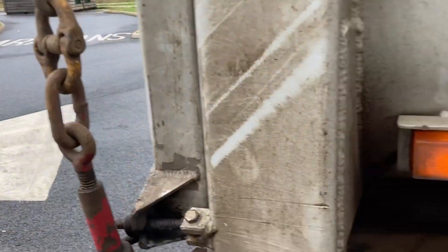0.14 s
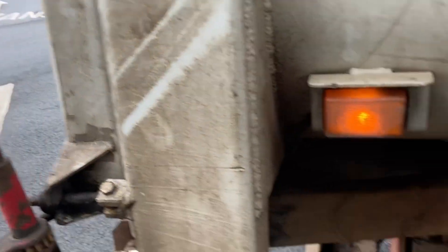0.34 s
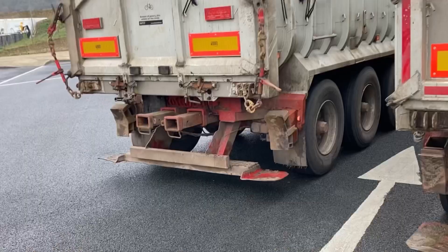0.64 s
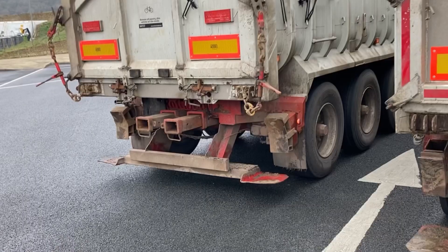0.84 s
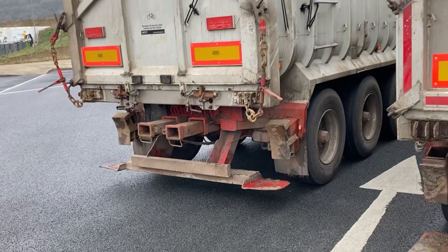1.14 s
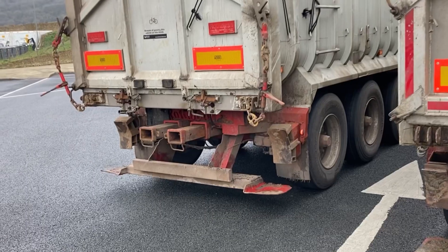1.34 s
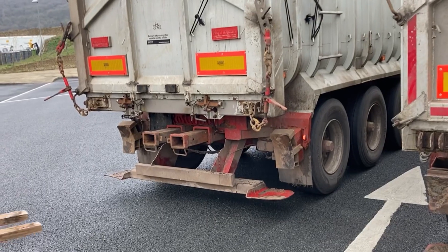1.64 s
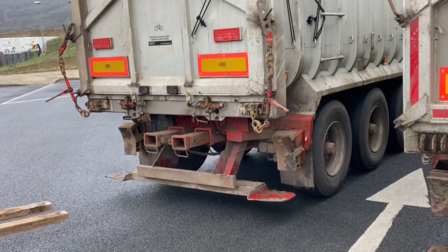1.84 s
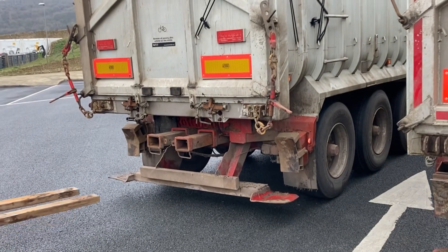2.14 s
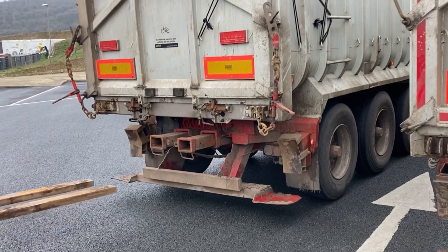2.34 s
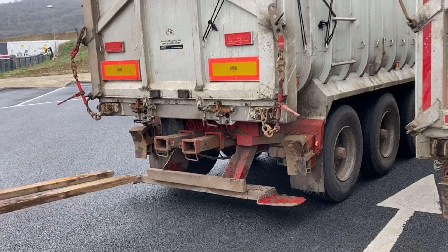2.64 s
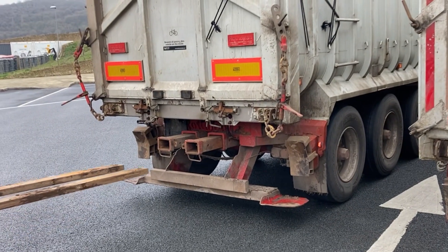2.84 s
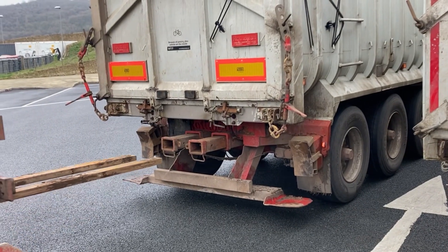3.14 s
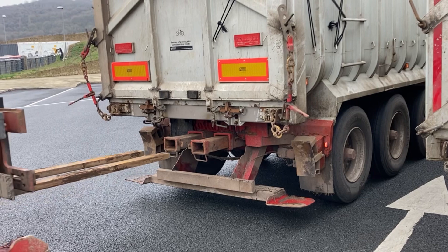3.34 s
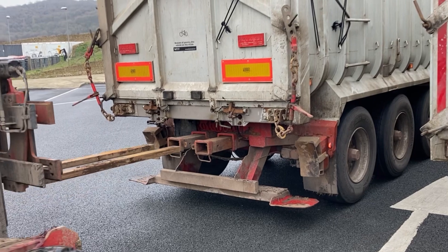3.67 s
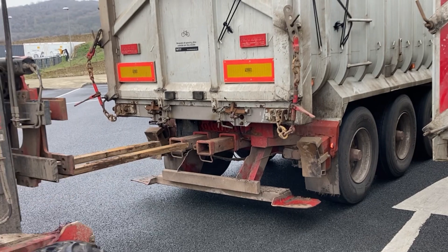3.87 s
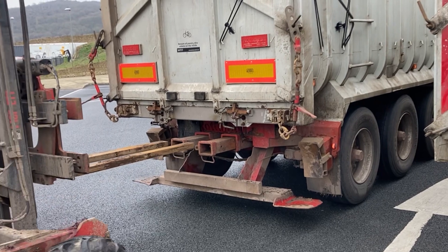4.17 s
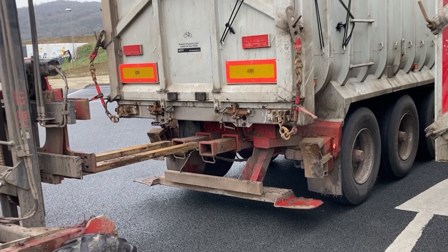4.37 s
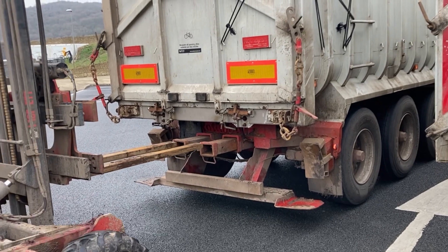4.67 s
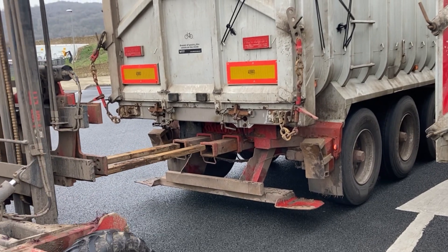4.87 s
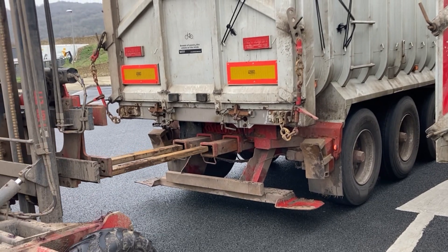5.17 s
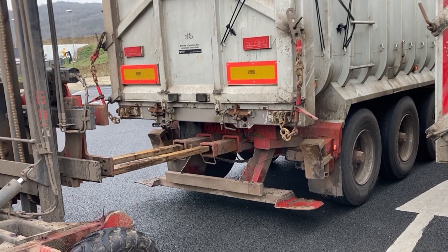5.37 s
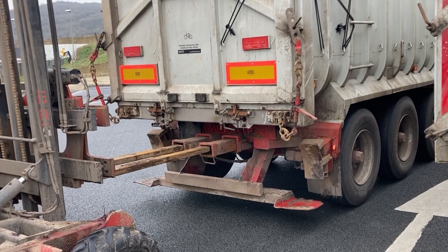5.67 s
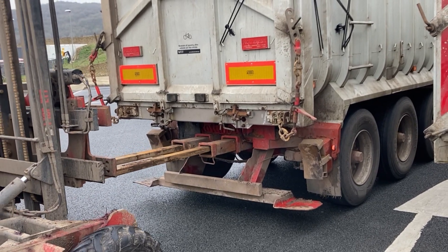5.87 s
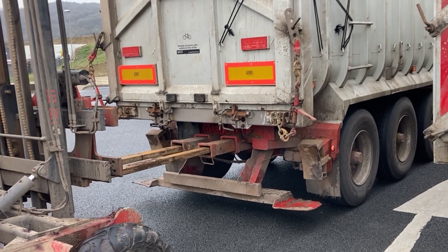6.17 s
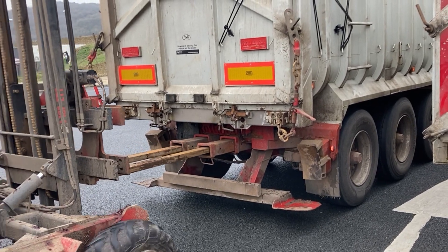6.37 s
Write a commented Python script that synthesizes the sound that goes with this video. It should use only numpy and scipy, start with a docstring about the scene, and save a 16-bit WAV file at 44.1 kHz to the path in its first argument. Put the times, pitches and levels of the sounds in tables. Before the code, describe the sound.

A diesel engine throbs at a distance, then a forklift is suddenly close, clattering as it slows, and revs up at the end.

```python
"""A four-cylinder diesel forklift idles behind a trailer, then is abruptly close, driving in from the left.
Its engine, nine-piston pump and fan radiate tones locked to the firing rate. Each firing excites the
block, which roars, knocks and clatters; the bodywork growls, loose metal rattles, and valve gear and
injectors tick high up. A low hum from the yard beats with the firing tone. The sound reaches two
microphone ports a fraction of a millisecond apart."""
import sys
import numpy as np
from scipy import signal
from scipy.fft import rfft, irfft, next_fast_len
from scipy.io import wavfile
from scipy.ndimage import uniform_filter1d

SR = 44100
rng = np.random.default_rng(int(sys.argv[2]) if len(sys.argv) > 2 else 0)


def inscribe(sig):
    """Save sig as 16-bit PCM at rate SR to the path in sys.argv[1].

    A 1-D sig is mono; a 2-D sig holds one channel per row.
    Samples are clipped to [-1, 1] before scaling.
    """
    pcm = np.round(np.clip(np.atleast_2d(sig).T, -1, 1) * 32767)
    wavfile.write(sys.argv[1], SR, pcm.astype(np.int16))


N = 287091
T = np.arange(N) / SR

# Dull knocks of the distant idle. Each row: start in seconds, level in dB, frequency in Hz.
IDLE_KNOCKS = [(0.062, -12, 204), (0.102, -16, 256), (0.153, -17, 163), (0.175, -13.5, 211),
               (0.225, -17, 264), (0.328, -14, 158), (0.46, -18, 258), (0.494, -12.5, 192)]
# The idle behind the trailer. Each row: time in seconds, bass, body and treble levels in dB.
IDLE_BANDS = [(0., -19, -34, -39), (.075, -22.5, -33.5, -38.5), (.2, -29, -34, -38),
              (.49, -23.5, -33, -38.5), (.615, -26, -35, -38)]
# Faint tones of the idle. Each row: frequency in Hz, level in dB.
IDLE_TONES = [(62, -32), (86, -48), (355, -41), (608, -48.5), (790, -49)]
# Combustion strength. Each entry: relative level of one cylinder in dB.
CYLINDER_LEVELS = [-1, 6.5, -2.5, -28]
# The two ports. Each row: frequency in Hz, then coherence from 0 to 1 and lead of the left port
# in half turns, for each of three positions: far left, beside, behind the trailer.
PORT_COHERENCE = [(60, .985, .03, .985, .03, .7, 0.), (100, .985, .045, .985, .04, .65, 0.),
                  (300, .98, .13, .97, .13, .55, -.1), (550, .92, .3, .9, .37, .4, -.3),
                  (700, .88, .42, .8, .24, .35, -.4), (860, .84, .55, .78, .3, .3, -.5),
                  (1000, .8, .7, .75, .5, .3, -.6), (1550, .8, 1., .75, 1., .4, -1.),
                  (2100, .75, 1.5, .3, 1.6, .35, -1.4), (2500, .7, 1.9, .7, 2.2, .3, -1.8),
                  (3000, .5, 2.4, .8, 3., .3, -2.3), (3700, .55, 3., .65, 3.8, .25, -3.),
                  (4500, .45, 4., .7, 4.3, .25, -4.), (5400, .35, 4.7, .92, 5., .25, -4.7),
                  (6800, .5, 5.9, .85, 6., .5, -5.9), (8300, .8, 6.5, .85, 6.5, .8, -6.5),
                  (8700, .99, 6.97, .99, 6.97, .99, -6.97), (9400, .99, 7.03, .99, 7.03, .99, -7.03),
                  (11200, .8, 8., .9, 8., .8, -8.), (13200, .99, 8.97, .99, 8.95, .99, -8.97),
                  (14400, .99, 9.03, .99, 9.05, .99, -9.03), (15300, .99, 10., .99, 10., .99, -10.)]
# Port balance. Each row: frequency in Hz, left minus right in dB from far left, the same from beside.
PORT_BALANCE = [(60, .4, -.1), (110, .5, -.1), (200, .5, .3), (380, .8, -.4), (700, 2, 3.5), (1290, 1.5, 3),
                (2380, -.5, 1), (4400, 0, 0), (8120, -.5, 0), (15000, 0, 0)]
# The truck's path. Each row: time in seconds, bearing from 0 (far left) to 1 (beside the microphone).
TRUCK_BEARING = [(.62, 0.059), (1.5, 0.16), (2, 0.19), (2.5, 0.51), (3, 0.55), (3.5, 0.92), (4, 1.),
                 (6.51, 1)]
# The close engine. Each row: time in seconds, firing rate in Hz, then relative levels in dB
# of load and nearness, of the block's roar and of the hiss.
ENGINE_RUN = [(.62, 56.76, -3, -23, -52), (.82, 56.94, -2, -21, -51), (1.18, 54.11, -2, -20, -51),
              (1.7, 53.4, 0, -24, -48.5), (2.05, 51.67, 0, -16, -47.5), (2.6, 50.83, 1, -14, -46),
              (3.05, 49.96, 1, -12.5, -45), (3.3, 48.81, 0, -20.5, -45), (3.7, 45.27, -1.5, -13, -46),
              (3.95, 45.16, -1.5, -14.5, -43), (4.2, 43.61, -2.5, -11, -44.5),
              (4.55, 44.77, -1.5, -17.5, -45), (4.8, 43.21, -1.5, -18, -44.5),
              (5.04, 45.18, -2, -11.5, -44.5), (5.16, 43.88, -2, -13, -44.5), (5.27, 41.35, -4, -18, -45),
              (5.39, 40.05, -3.5, -20, -46), (5.7, 42.43, -2, -15, -44.5), (5.94, 45.5, -1.5, -16, -44),
              (6.1, 50.44, 3, -10, -41), (6.24, 54.87, 4.5, -15, -40), (6.35, 56.14, 5, -14, -40.5),
              (6.51, 56.74, 5.5, -23, -40)]
# Engine tones locked to the firing rate, with pump and fan overtones. Each row: multiple of the firing
# rate (sounded at the nearest quarter), share of the load it follows, waver in dB, response of pipe,
# bodywork and yard as pairs of Hz and dB.
ENGINE_ORDERS = [(1, 0.76, 0.8, [(40, -33), (44, -27), (47, -27), (49, -21), (51, -21), (54, -19),
                 (57, -18)]), (2.003, 0.7, 0.23, [(80, -11), (90, -14), (101, -15.5), (104, -18),
                 (114, -17)]), (3, 0.21, 1, [(120, -24.5), (132, -25.5), (138, -29.5), (144, -28),
                 (152, -38), (157, -40), (160, -28), (170, -31)]), (7 / 4, 0.46, 0.93, [(70, -39),
                 (85, -42), (100, -35)]), (9 / 4, 0.5, 1.2, [(90, -35), (104, -30), (115, -44),
                 (128, -48)]), (13 / 4, 0.5, 1.6, [(150, -54), (166, -40), (184, -36)]),
                 (37 / 4, 0.38, 1.7, [(450, -63), (490, -40.5), (525, -42)]),
                 (27 / 2, 0.5, 2.5, [(540, -59), (610, -43), (690, -46), (770, -45)]),
                 (4.12, 0., 1.5, [(160, -26), (168, -30), (178, -44), (230, -53)]),
                 (18, 0.3, 1.5, [(800, -54), (840, -41), (855, -41), (875, -62)]),
                 (18, 0.3, 0.96, [(780, -57), (840, -44), (862, -38), (880, -42), (905, -48), (930, -43),
                 (985, -59), (1015, -43.5)]), (20, 0.3, 0.99, [(840, -50), (870, -37.5), (885, -39.5),
                 (905, -48), (950, -58)])]
# The pump's tone. Each row: time in seconds, level in dB.
PUMP_LEVELS = [(.62, -40), (1.3, -33), (1.8, -49), (2.3, -34), (2.8, -26.5), (3.05, -22), (3.5, -24.5),
               (3.8, -28), (4.3, -29.5), (5.05, -29), (5.3, -29), (5.8, -34.5), (5.95, -26.5), (6.12, -28),
               (6.18, -23), (6.23, -17), (6.29, -24.5), (6.42, -24.5), (6.48, -14.5)]
# The fan. Each row: time in seconds, level of the blade tone in dB, level of its octave in dB.
FAN_LEVELS = [(.62, -22.5, -42), (.95, -27.5, -50), (1.1, -28, -52), (1.35, -33, -45), (1.7, -27, -39),
              (1.92, -24.5, -39), (2.05, -20.5, -30), (2.35, -25, -32), (2.55, -18.5, -37), (2.7, -20, -50),
              (2.95, -16.5, -34), (3.17, -18, -37), (3.27, -27, -46), (3.5, -41, -52), (3.75, -35, -52),
              (5.1, -31.5, -50), (5.4, -42, -46), (5.9, -35, -46), (6.09, -30, -44), (6.13, -19, -36),
              (6.19, -16.5, -34), (6.24, -28, -40), (6.34, -21, -40), (6.43, -26.5, -31), (6.51, -28, -38)]
# The bodywork's growl. Each row: time in seconds, frequency in Hz, relative level in dB.
BODY_RESONANCE = [(.62, 455, -24), (1, 446, -26.5), (1.4, 435, -22.5), (1.8, 406, -23.5), (2.1, 387, -25.5),
                  (2.5, 363, -26.5), (3.2, 334.5, -24), (4, 328, -23), (5.2, 327.4, -27.5), (5.6, 323, -24),
                  (6.1, 331, -21.5), (6.51, 332, -19.5)]
# A thin whine. Each row: time in seconds, level in dB.
WHINE_LEVELS = [(.62, -48), (2.8, -42), (3.3, -32), (3.8, -45), (4.3, -31), (4.8, -50), (5.1, -42),
                (5.6, -55), (6, -40), (6.51, -43)]
# Loose metal on the mast. Each row: mode frequency in Hz, relative level in dB.
MAST_MODES = [(1950, -1.5), (2250, -3.5), (2450, 5), (2750, 1), (3300, 5), (3850, -3.5), (4300, -7)]
# Hard combustion raps. Each row: start in seconds, relative level in dB.
HARD_RAPS = [(1.2112, -30), (1.961, -18), (2.1146, -27), (2.157, -29), (2.1919, -25), (2.2518, -26),
             (3.042, -29), (3.1378, -27), (3.3015, -20), (3.4715, -23), (3.5364, -25), (3.7973, -24),
             (4.2702, -25), (4.4483, -25), (5.3707, -22), (5.468, -26), (5.912, -23), (6.0197, -23)]
# The loudest injector ticks. Each row: start in seconds, relative level in dB, frequency in Hz.
LOUD_TICKS = [(2.9478, -35, 11700), (3.1888, -28, 12000), (3.2701, -34, 12200), (3.3968, -33, 12100),
              (3.4357, -33, 12400), (3.6073, -32, 12300), (3.6532, -31, 12300), (4.0693, -32, 12200),
              (4.4574, -30, 12400), (4.5946, -28, 12100), (4.843, -31, 12100), (4.866, -34, 12200),
              (4.9118, -32, 12300), (4.9567, -29, 12300), (5.2042, -29, 12300), (5.2755, -30, 12400),
              (5.301, -29, 12300), (5.3274, -34, 12400), (5.3509, -27, 11800), (5.3758, -27, 12300),
              (5.4531, -28, 12400), (5.4751, -29, 12100), (5.499, -31, 11900), (5.6966, -32, 12300),
              (5.7634, -24, 12400), (5.9864, -31, 11900)]
# Spectra of the engine's broadband sounds. Each row: frequency in Hz, relative spectral density in dB.
IDLE_SPECTRUM = [(30, -16), (45, -3), (85, -4), (125, -10), (350, -9), (700, -18.5), (1500, -25),
                 (3000, -33), (5500, -45.5), (9000, -49), (12500, -56.5), (16000, -75)]
ROAR_SPECTRUM = [(27, -38), (46, -13), (75, -6), (102, -19.5), (118, -14.5), (152, -15), (269, -7.5),
                 (323, -5), (415, -25), (470, -14.5), (700, -26), (910, -47), (1540, -120)]
KNOCK_SPECTRUM = [(40, -23), (95, -7), (160, -14), (300, -1.5), (430, -9), (520, -8.5), (600, -18),
                  (860, -18), (1100, -22), (1600, -50)]
CLATTER_SPECTRUM = [(350, 0.5), (500, -3.5), (700, 1), (900, -4), (1150, -1.5), (1400, -4), (1700, -10),
                    (2100, -10), (2600, -13), (3100, -15), (3800, -16), (4600, -21.5), (5200, -33),
                    (7000, -41)]
RASP_SPECTRUM = [(1500, -9.5), (1900, 10.5), (2300, 0.5), (2800, 6), (3300, -1.5), (3900, 0), (4600, -2),
                 (5500, -59)]
HISS_SPECTRUM = [(3500, -55), (5000, 1.5), (7000, 0.5), (9000, -5), (11000, 2), (13000, -4.5), (14000, -9),
                 (16000, -6.5)]

IDLE_FIRING_HZ, CLOSE_FROM_S, FIRING_AT_S = 29.34, 0.618, 5.302
TICK_HZ, SOFT_TICKS_FROM_S = 12300, 2.8


def gain_of(db):
    """Decibels express an amplitude ratio on a logarithmic scale."""
    return 10 ** (np.asarray(db) / 20)


def unit_rms(x):
    """Normalisation gives each channel unit mean power."""
    return x / np.sqrt(np.mean(x ** 2, axis=-1, keepdims=True) + 1e-20)


def white_pair():
    """Two incoherent white noises."""
    return rng.standard_normal((2, N))


def at_frequency(table, hz, column=1):
    """Interpolation of one column on a logarithmic frequency axis."""
    columns = np.transpose(table)
    return np.interp(np.log(hz + 1), np.log(columns[0] + 1), columns[column])


def curves(table):
    """Linear interpolation in time of every column after the first."""
    times, *columns = np.transpose(table)
    return [np.interp(T, times, column) for column in columns]


def by_bearing(far_left, beside):
    """Linear interpolation between two values as the truck drives in."""
    return far_left + (beside - far_left) * curves(TRUCK_BEARING)[0]


def coloured(x, spectrum):
    """Linear filtering imposes a spectrum on x; the result has rms 1."""
    size = next_fast_len(N)
    response = gain_of(at_frequency(spectrum, np.fft.rfftfreq(size, 1 / SR)))
    return unit_rms(irfft(rfft(x, size) * response, size)[..., :N])


def wander(hz):
    """Low-pass filtered noise fluctuates slowly, with rms 1."""
    return unit_rms(signal.sosfilt(signal.butter(2, hz, fs=SR, output="sos"), rng.standard_normal(N)))


def resonate(x, hz, width_hz):
    """Heterodyning makes a movable resonance of rms 1: shift hz to zero, low-pass, shift back."""
    carrier = np.exp(2j * np.pi * np.cumsum(hz * np.ones(N)) / SR)
    low_pass = signal.butter(2, width_hz / 2, fs=SR, output="sos")
    return unit_rms((carrier * signal.sosfilt(low_pass, x / carrier)).real)


def combustion_pulses(firings, scatter_db, decay):
    """Impulsive excitation: an envelope jumps at each firing; decay is a share of the interval."""
    count = firings.astype(int)
    chance = np.clip(rng.standard_normal(count[-1] + 1), -1.6, 1.6)
    strength = gain_of(np.asarray(CYLINDER_LEVELS)[count % 4] + scatter_db * chance[count])
    return strength * np.exp(-(firings % 1) / decay)


def distant_idle():
    """Amplitude modulation: behind the trailer, firings pulse the bass and body under faint tones."""
    noise = coloured(white_pair(), IDLE_SPECTRUM)
    bass = signal.sosfiltfilt(signal.butter(2, 125, fs=SR, output="sos"), noise)
    treble = signal.sosfiltfilt(signal.butter(2, 700, "high", fs=SR, output="sos"), noise)
    body = noise - bass - treble
    pulses = combustion_pulses(IDLE_FIRING_HZ * T + 0.047, scatter_db=1.8, decay=0.16)
    throb = uniform_filter1d(pulses, size=130)
    bands = [bass * (1 + 0.93 * throb), body * (1 + 1.6 * throb) * gain_of(4 * wander(12)), treble]
    rumble = sum(unit_rms(band) * gain_of(db) for band, db in zip(bands, curves(IDLE_BANDS)))
    tones = sum(gain_of(db) * np.cos(2 * np.pi * (hz * T + rng.random())) for hz, db in IDLE_TONES)
    return rumble + tones


def dull_knocks(decay_cycles=0.95, rise_cycles=0.24):
    """Heavily damped oscillation: each knock of the idle dies within a few periods."""
    out = np.zeros(N)
    for start, db, hz in IDLE_KNOCKS:
        cycles = np.arange(round(6 * decay_cycles * SR / hz)) * hz / SR
        envelope = np.exp(-cycles / decay_cycles) * (1 - np.exp(-cycles / rise_cycles))
        ring = gain_of(db) * np.sin(2 * np.pi * cycles) * envelope
        span = out[round(start * SR):][:len(ring)]
        span += ring[:len(span)]
    return out


def microphone_ports(pair, bearing, column):
    """Partial coherence: the right port hears the left one's sound late, with unrelated reflections."""
    hz, t, (direct, reflected) = signal.stft(pair, SR, nperseg=512, noverlap=384)
    share = np.interp(t, T, bearing)

    def blend(table, first, second):
        start, end = (at_frequency(table, hz, k)[:, None] for k in (first, second))
        return (1 - share) * start + share * end

    coherence = blend(PORT_COHERENCE, column, column + 2)
    lead = blend(PORT_COHERENCE, column + 1, column + 3)
    right = coherence * direct * np.exp(-1j * np.pi * lead) + np.sqrt(1 - coherence ** 2) * reflected
    lean = gain_of(blend(PORT_BALANCE, 1, 2) / 2)
    return signal.istft(np.array([direct * lean, right / lean]), SR, nperseg=512, noverlap=384)[1][:, :N]


def engine_orders(firing_hz, firings, load_db):
    """Periodicity locks tones to the firing rate; unequal cylinders throb once in four firings."""
    unevenness = 0.017 + 0.19 * np.exp(-((T - 3.5) / 0.16) ** 2)  # grows as the engine briefly stumbles
    throb = 1 + unevenness * np.cos(2 * np.pi * firings / 4 + 1.8)
    lagged_hz = np.interp(T - 0.067, T, firing_hz)  # resonances swept quickly answer late
    out = np.zeros(N)
    for order, load_share, waver_db, response in ENGINE_ORDERS:
        db = at_frequency(response, order * lagged_hz) + load_share * load_db + waver_db * wander(6.5)
        jitter = 0.02 * max(order - 3, 0) * wander(10.6)
        out += np.sqrt(2) * gain_of(db) * np.cos(np.pi / 2 * round(4 * order) * firings + jitter)
    return throb * out


def piston_pump(firings, load_db):
    """Pressure ripple: nine pistons sound a tone at 9/2 of the firing rate, steadier under load."""
    looseness = gain_of(-2 * np.maximum(load_db, 0))
    db = curves(PUMP_LEVELS)[0] + by_bearing(1, 3) * looseness * wander(19)
    jitter = by_bearing(0.2, 0.7) * looseness * wander(10)
    return np.sqrt(2) * gain_of(db) * np.cos(2 * np.pi * 9 / 2 * firings + jitter)


def fan(firings):
    """Blade passage radiates a tone and its octave, at 6 and 12 times the firing rate."""
    out = np.zeros(N)
    for order, db in zip((6, 12), curves(FAN_LEVELS)):
        amplitude = np.sqrt(2) * gain_of(db + 1.1 * wander(10.6))
        out += amplitude * np.cos(order * (2 * np.pi * firings + 0.02 * wander(13)))
    return out


def yard_hum(load_db, hz=50):
    """Beating: a hum from the yard and a narrow drone lie close to the firing tone."""
    drone = resonate(rng.standard_normal(N), 50.2, width_hz=16)
    drone *= gain_of(by_bearing(-33, -32) - 0.5 * load_db)
    amplitude = np.sqrt(2) * gain_of(-32 + 1.4 * wander(3))
    return drone + amplitude * np.cos(2 * np.pi * hz * T + 1.24 * wander(1.3))


def block_roar(firings, roar_db):
    """Forced vibration: the block radiates low noise that swells at each firing."""
    drive = white_pair() * (1 + 0.6 * combustion_pulses(firings, scatter_db=1.5, decay=0.6))
    return coloured(drive, ROAR_SPECTRUM) * gain_of(roar_db - 8 + 0.66 * wander(5.3))


def bodywork_growl():
    """Resonance: noise drives a broad and a narrow peak of the bodywork, which glide together."""
    hz, db = curves(BODY_RESONANCE)
    drive = white_pair()
    growl = resonate(drive, hz, width_hz=82) + 0.5 * resonate(drive, 1.03 * hz, width_hz=19)
    return growl * gain_of(db - 2.5)


def cylinder_knock(firings, load_db, likeness=0.7, points=64):
    """Periodicity: each cylinder repeats its own knock on the block, giving a comb of quarter orders."""
    shared, own = rng.standard_normal(points), rng.standard_normal((4, points))
    decay = np.exp(-np.arange(points) / points / 0.47)
    cycle = ((likeness * shared + (1 - likeness) * own) * decay).ravel()
    knocks = np.interp(firings * points, np.arange(4 * points), cycle, period=4 * points)
    return coloured(knocks, KNOCK_SPECTRUM) * gain_of(-25.5 + 0.89 * load_db + 1.3 * wander(8.9))


def clatter(firings, load_db):
    """Amplitude modulation: each firing throbs in the metal's midrange noise, which grows with load."""
    drive = white_pair() * (1 + 0.15 * combustion_pulses(firings, scatter_db=0.53, decay=1))
    return coloured(drive, CLATTER_SPECTRUM) * gain_of(-24 + load_db + 0.19 * wander(15))


def combustion_rasp(firings, load_db):
    """Repeated impulsive excitation: small raps merge into a rasp, bunching once per engine cycle."""
    bunching = gain_of(0.67 * np.cos(2 * np.pi * firings / 4 + 0.18) + 2 * wander(24))
    pulses = 1 + 0.36 * combustion_pulses(firings, scatter_db=1.6, decay=0.29)
    rasp = coloured(white_pair() * bunching * pulses, RASP_SPECTRUM)
    return rasp * gain_of(by_bearing(-41, -36.5) + 0.23 * load_db)


def engine_hiss(firings, hiss_db):
    """Modulation at two rates: treble noise pulses with each firing and with each engine cycle."""
    drive = white_pair() * (1 + 0.29 * combustion_pulses(firings, scatter_db=3, decay=0.6))
    flicker_db = 0.92 * wander(18) + np.cos(2 * np.pi * firings / 4 + 0.2)
    return coloured(drive, HISS_SPECTRUM) * gain_of(hiss_db + 7.5 + flicker_db)


def shimmer(x, depth_db):
    """Colouration: random, slowly shifting spectral ripples give the clatter a faint ringing colour."""
    _, _, spectra = signal.stft(x, SR, nperseg=1024, noverlap=768)
    ripples = uniform_filter1d(rng.standard_normal(spectra.shape), size=2, axis=0)
    ripples = uniform_filter1d(ripples, size=24, axis=1)
    response = gain_of(depth_db * np.tanh(ripples / ripples.std()))
    return signal.istft(spectra * response, SR, nperseg=1024, noverlap=768)[1][:, :N]


def ground_reflection(x):
    """Interference with a dull echo off the asphalt hollows out a band, lower as the truck nears."""
    delay_s = by_bearing(0.9, 1.22) / 1000
    echo = np.array([np.interp(T - delay_s, T, dull) for dull in uniform_filter1d(x, size=24)])
    return x + by_bearing(0.26, 0.44) * echo


def mast_rattle(load_db, taps_per_s=110, t60_s=0.016):
    """Free vibration: loose parts tap at random, each tap ringing one damped mode."""
    strength = gain_of(3.5 * np.minimum(rng.exponential(1, (2, N)), 3))
    taps = strength * (rng.random((2, N)) < taps_per_s / SR)
    struck_mode = rng.integers(0, len(MAST_MODES), (2, N))
    t, out = T[:2500], np.zeros((2, N))
    for mode, (hz, db) in enumerate(MAST_MODES):
        ring = gain_of(db - 60 * t / t60_s) * (1 - np.exp(-t / 0.001)) * np.sin(2 * np.pi * hz * t)
        out += signal.oaconvolve(taps * (struck_mode == mode), ring[None])[:, :N]
    return unit_rms(out) * gain_of(-45 + 0.5 * load_db)


def radiator_hiss():
    """Directivity: a band of hiss off the radiator side fades as the truck draws alongside."""
    return resonate(white_pair(), 5400, width_hz=1800) * gain_of(by_bearing(-44, -60))


def thin_whine():
    """Narrow-band noise is heard as a wavering pitch."""
    return resonate(white_pair(), 866.6, width_hz=13) * gain_of(curves(WHINE_LEVELS)[0])


def valve_taps(firings, scatter_db, decay):
    """Impact envelope of the valve gear: a tap at each firing, a softer one half way to the next."""
    count = (2 * firings).astype(int)
    chance = np.clip(rng.standard_normal(count[-1] + 1), -1.6, 1.6)
    return gain_of(scatter_db * chance[count] - 6.2 * (count % 2)) * np.exp(-(firings % 0.5) / decay)


def valve_gear(firings, load_db):
    """Impact excitation: the taps drive two high resonances, a ring and a ticking."""
    ring_drive = white_pair() * (0.5 + valve_taps(firings, scatter_db=4, decay=0.33))
    tick_drive = white_pair() * (0.5 + valve_taps(firings, scatter_db=4.5, decay=0.25))
    ring = resonate(ring_drive, 9950, width_hz=340) * gain_of(by_bearing(-46, -44.5) + 1.54 * load_db)
    ticking = resonate(tick_drive, TICK_HZ, width_hz=800) * gain_of(by_bearing(-57, -49))
    return ring + ticking


def combustion_raps(rise_s=0.0012, decay_s=0.0085):
    """Transients: harder combustion raps stand out of the rasp as decaying bursts of metallic noise."""
    envelope = np.zeros(N)
    for start, db in HARD_RAPS:
        age = np.maximum(T - start, 0)
        envelope += gain_of(db - 4.5) * np.exp(-age / decay_s) * np.minimum(age / rise_s, 1)
    return coloured(white_pair(), RASP_SPECTRUM) * envelope


def injectors(firings, rise_s=0.0025, decay_s=0.005, bounce_s=0.010):
    """Impact and rebound: a needle rings and bounces once, in loud ticks and soft ones twice a firing."""
    soft = np.flatnonzero(np.diff(np.floor(2 * firings)) > 0)
    strikes = np.zeros(N)
    hz = TICK_HZ * (1 + 0.017 * wander(20))
    strikes[soft] = gain_of(-37.5 + 3.7 * rng.standard_normal(len(soft))) * (T[soft] > SOFT_TICKS_FROM_S)
    for start, db, tick_hz in LOUD_TICKS:
        strikes[round(start * SR)] += gain_of(db + 1)
        hz[round(start * SR):][:700] = tick_hz
    t = T[:1500]
    tick = np.exp(-t / decay_s) * (1 - np.exp(-t / rise_s))
    bounce = gain_of(-7) * np.interp(t - bounce_s, t, tick, left=0)
    return signal.oaconvolve(strikes, tick + bounce)[:N] * resonate(white_pair(), hz, width_hz=500)


def close_engine():
    """Superposition: the close sources add into a direct and a reflected signal."""
    firing_hz, load_db, roar_db, hiss_db = curves(ENGINE_RUN)
    firings = np.cumsum(firing_hz) / SR
    firings += 1 - firings[round(FIRING_AT_S * SR)] % 1  # one firing falls on this moment
    tones = engine_orders(firing_hz, firings, load_db) + piston_pump(firings, load_db) + fan(firings)
    tones += yard_hum(load_db)
    block = block_roar(firings, roar_db) + bodywork_growl() + cylinder_knock(firings, load_db)
    metal = clatter(firings, load_db) + combustion_rasp(firings, load_db)
    metal += engine_hiss(firings, hiss_db) + combustion_raps()
    pair = ground_reflection(block + shimmer(metal, depth_db=3))
    pair += mast_rattle(load_db) + radiator_hiss() + thin_whine()
    pair += valve_gear(firings, load_db) + injectors(firings)
    pair[0] += tones  # in the direct signal only
    return pair


def scene():
    """A rapid crossfade leads from the distant idle to the close engine."""
    # columns 5 and 6 (behind the trailer) hold for the idle; the close engine moves from 1, 2 to 3, 4
    far = microphone_ports(distant_idle() + dull_knocks(), bearing=np.ones(N), column=3)
    near = microphone_ports(close_engine(), bearing=curves(TRUCK_BEARING)[0], column=1)
    fade_out = np.clip((CLOSE_FROM_S - T) / 0.014, 0, 1)
    fade_in = np.clip((T - CLOSE_FROM_S + 0.0064) / 0.019, 0, 1)
    return fade_out * far + fade_in * near


def record(dry):
    """Band limiting and saturation: the microphone sheds deep bass, rounds peaks and cuts the top."""
    bass_cut = signal.sosfiltfilt(signal.butter(4, 36, "high", fs=SR, output="sos"), dry)
    saturated = 1.275 * np.tanh(bass_cut / 1.354)
    low_pass = signal.firwin(511, 15850, window=("kaiser", 9), fs=SR)
    return signal.oaconvolve(saturated, low_pass[None], "same")


dry = scene()
out = record(dry)
inscribe(out)
```